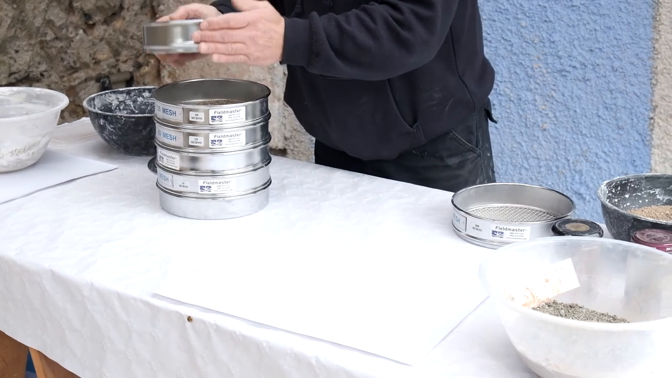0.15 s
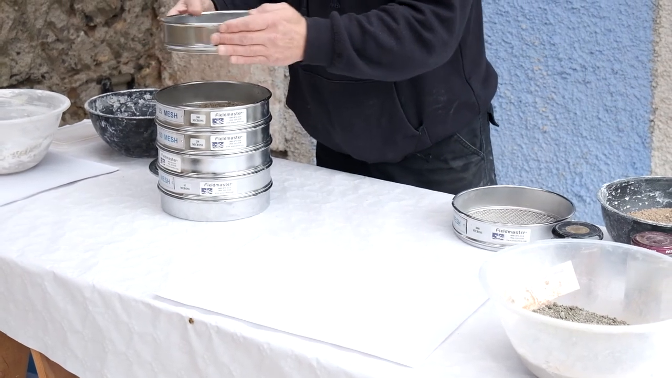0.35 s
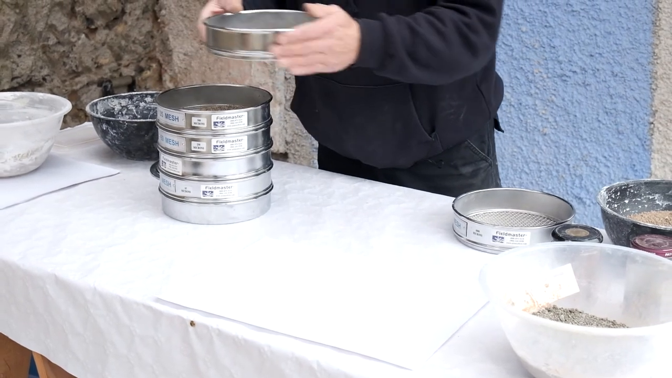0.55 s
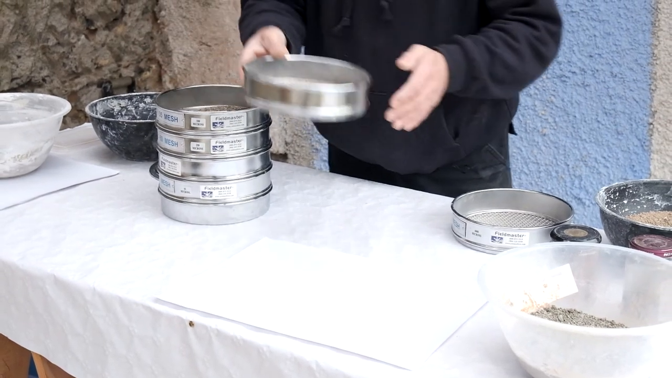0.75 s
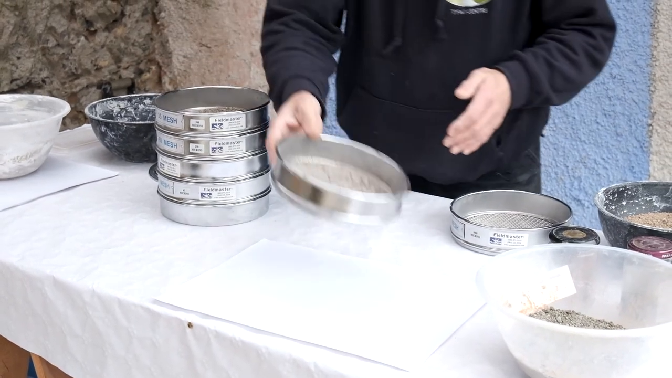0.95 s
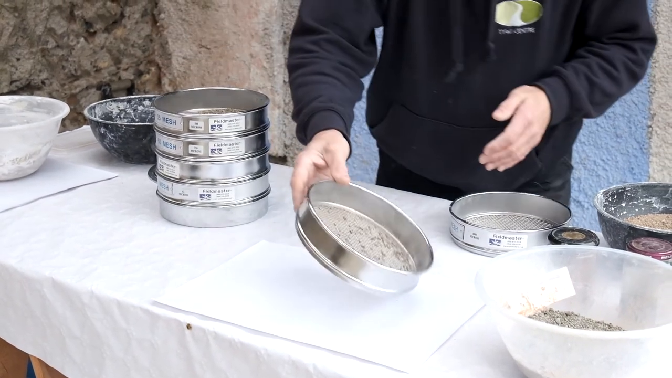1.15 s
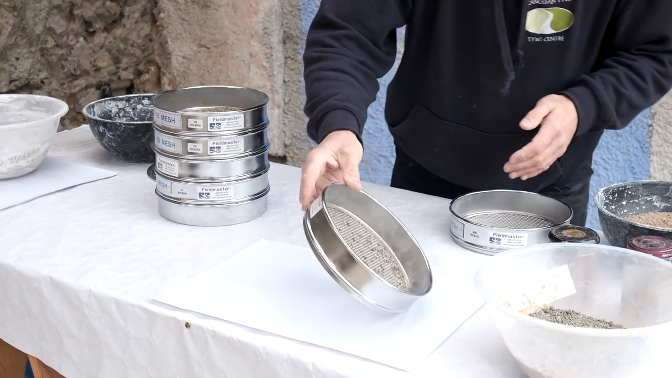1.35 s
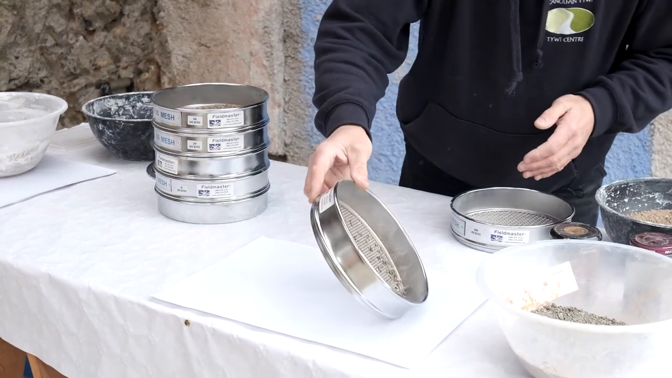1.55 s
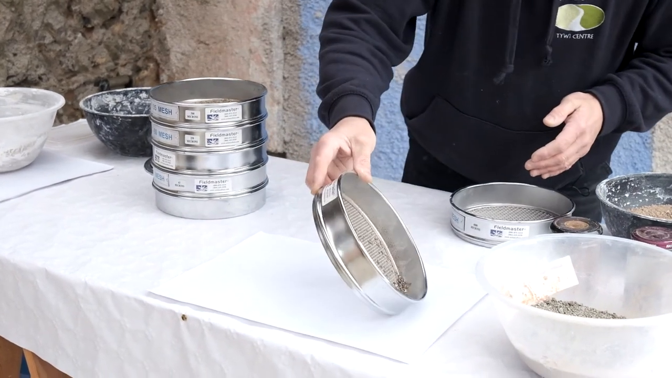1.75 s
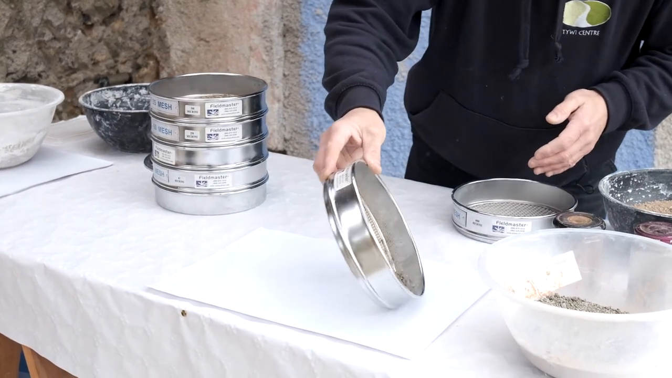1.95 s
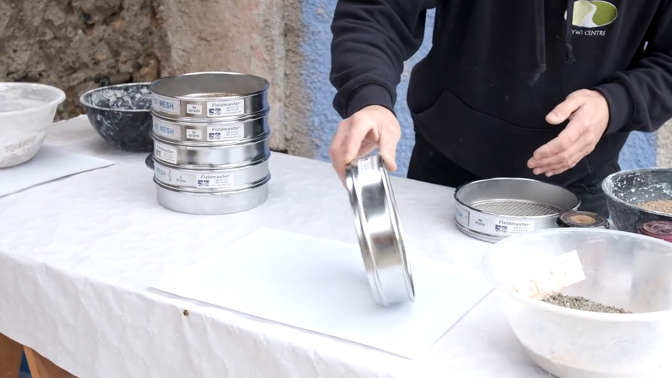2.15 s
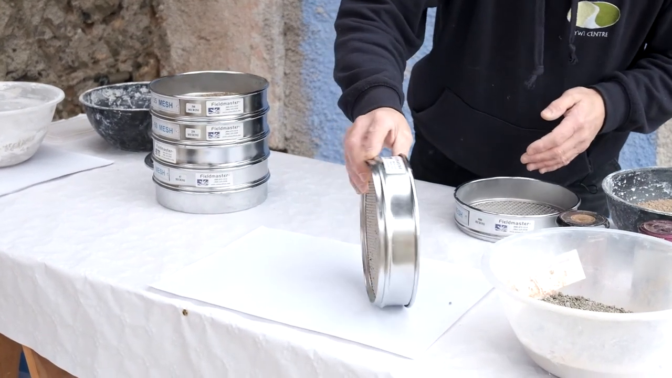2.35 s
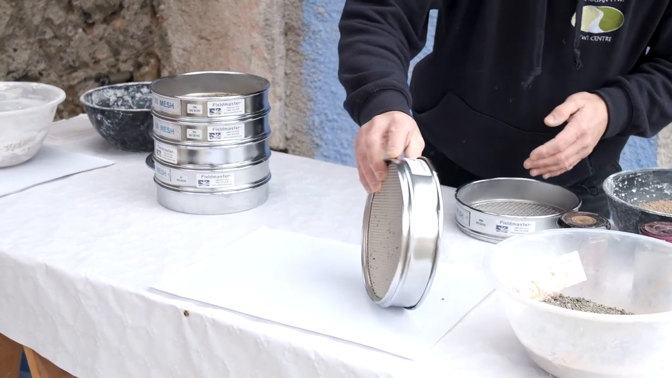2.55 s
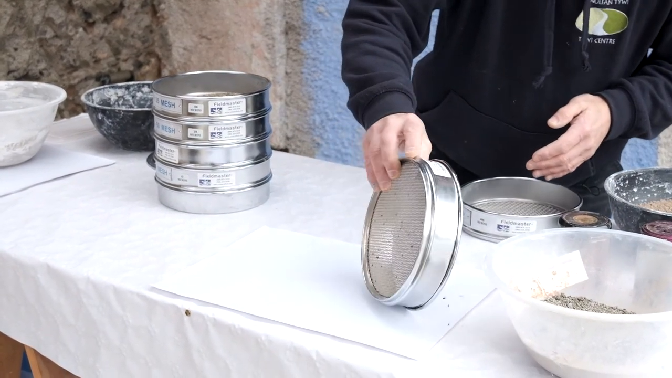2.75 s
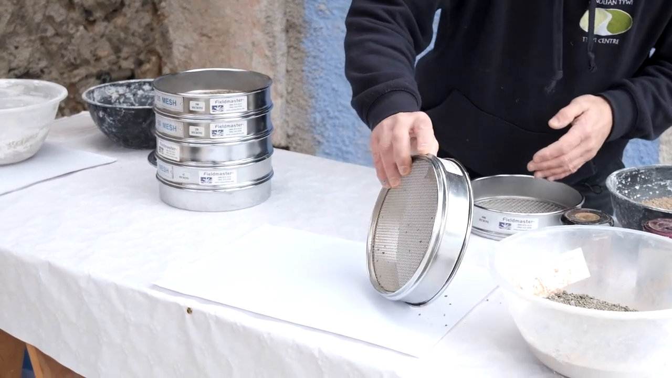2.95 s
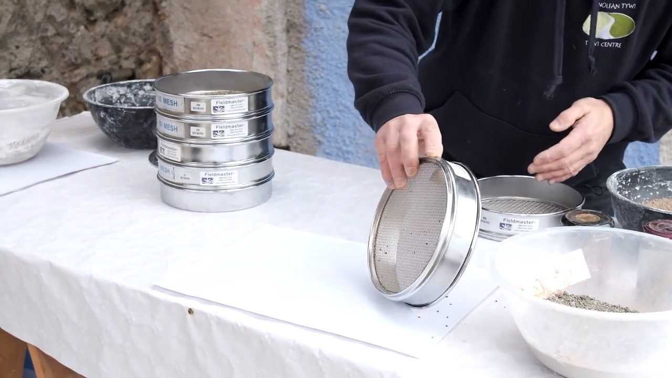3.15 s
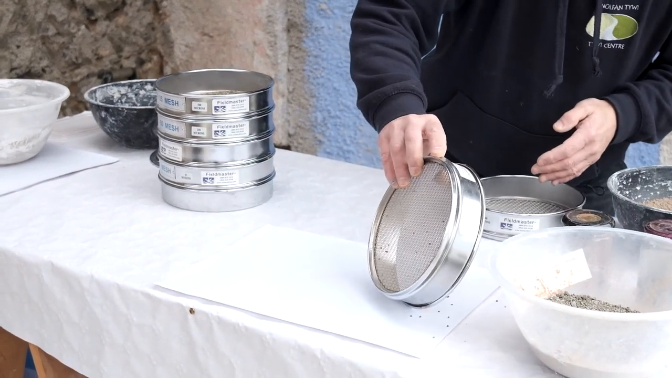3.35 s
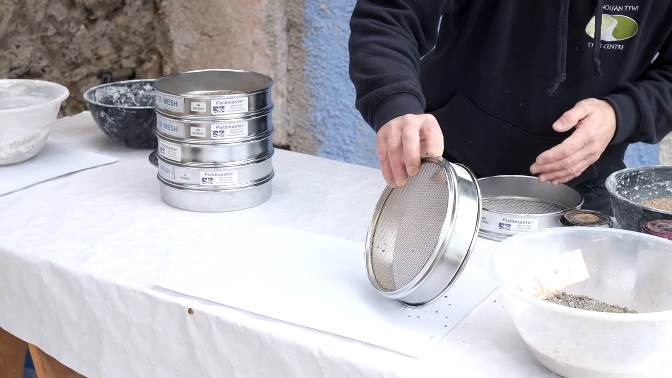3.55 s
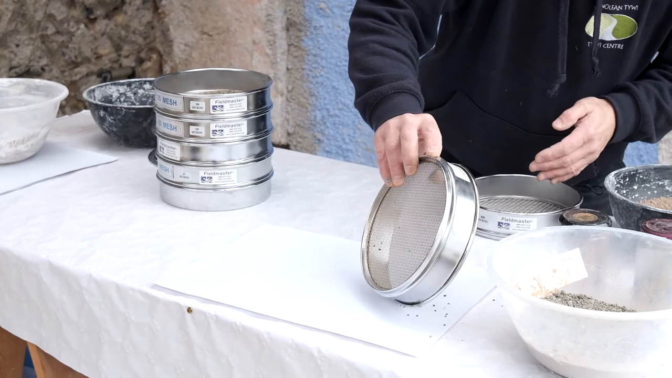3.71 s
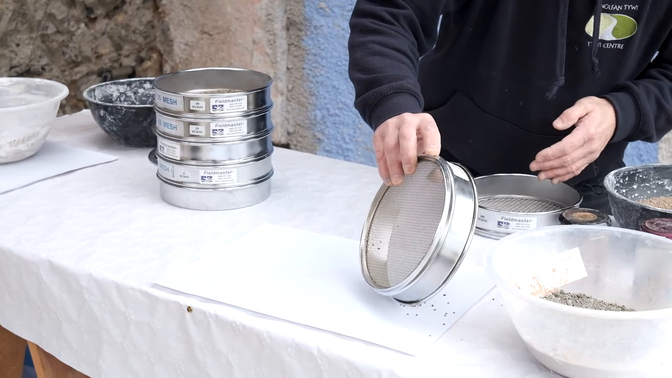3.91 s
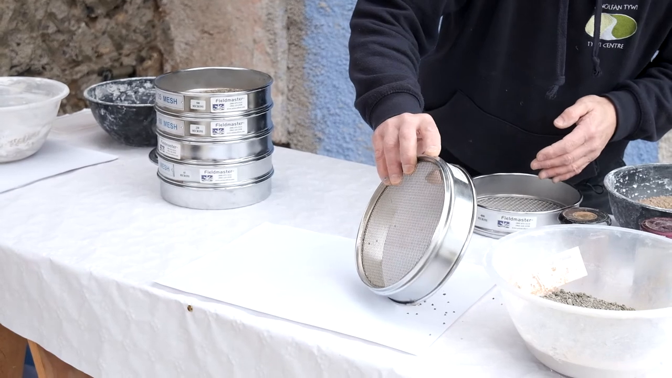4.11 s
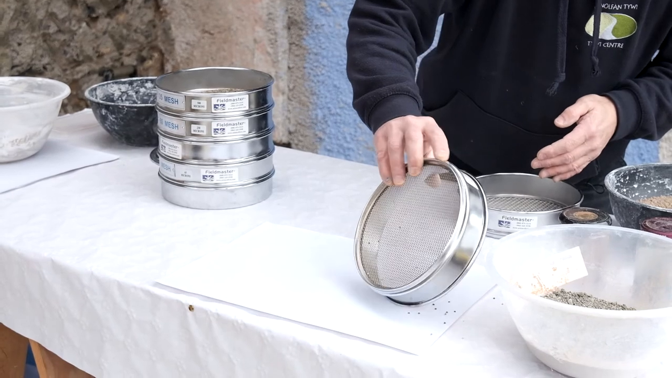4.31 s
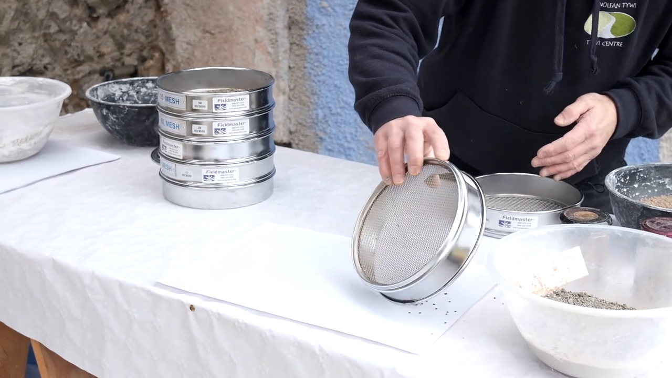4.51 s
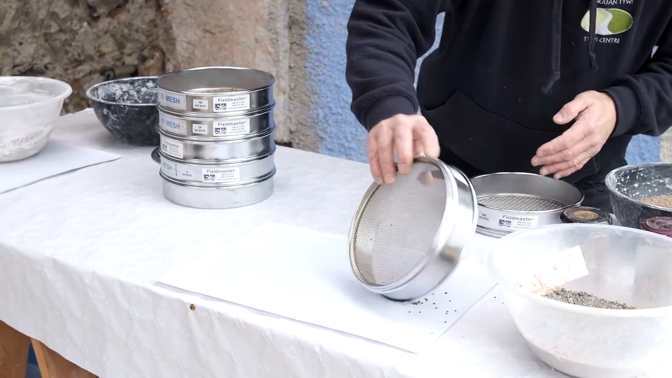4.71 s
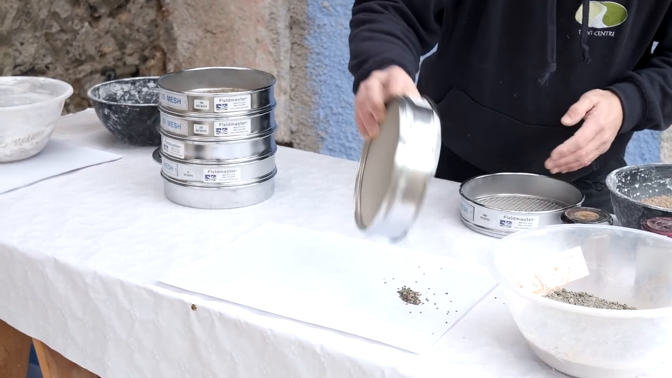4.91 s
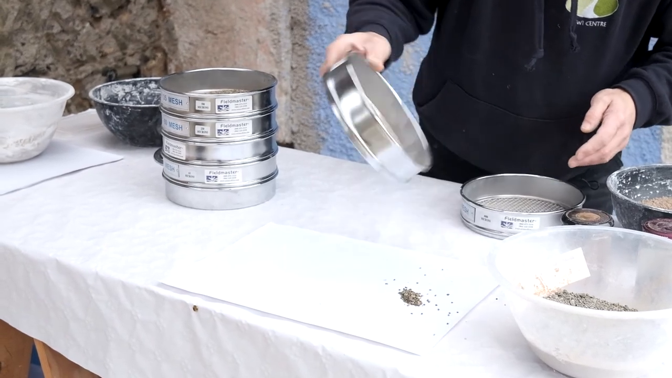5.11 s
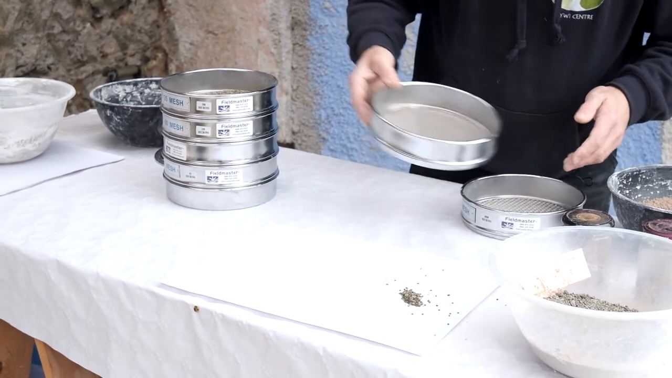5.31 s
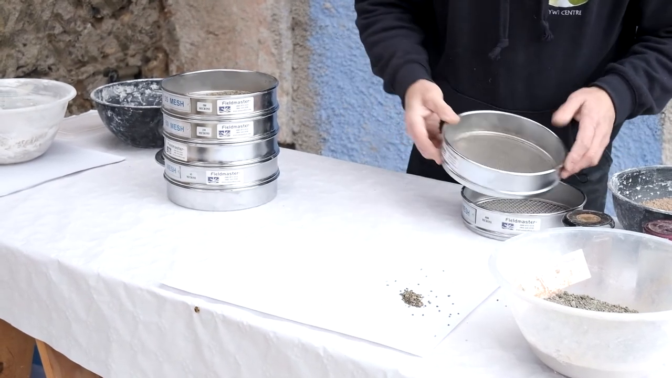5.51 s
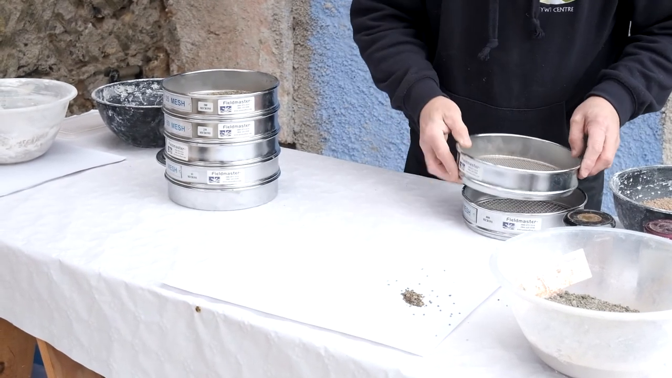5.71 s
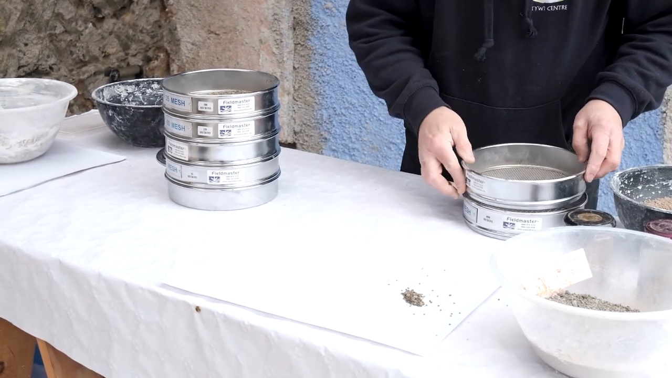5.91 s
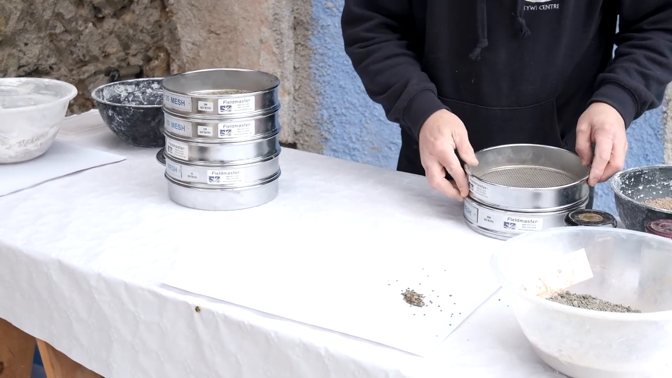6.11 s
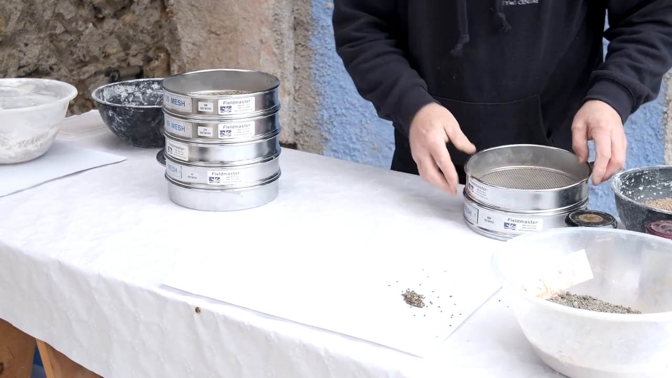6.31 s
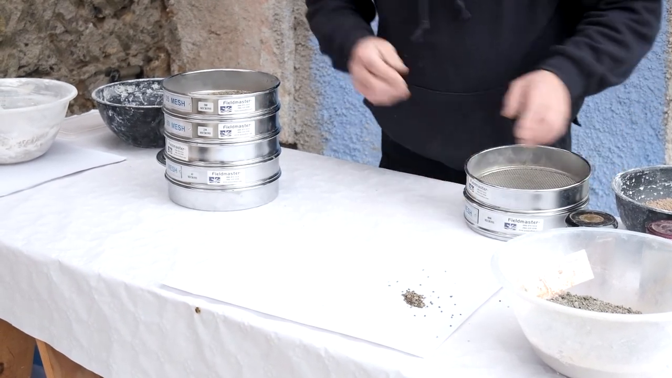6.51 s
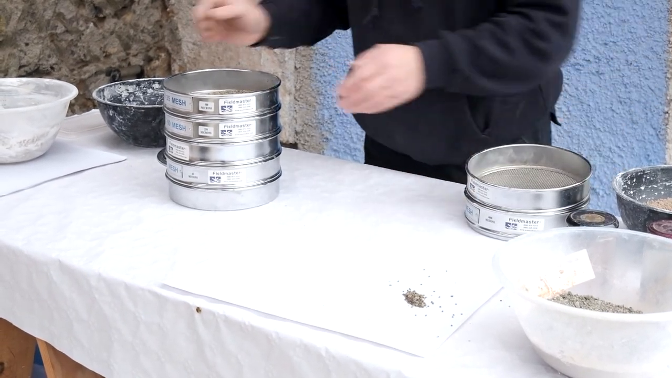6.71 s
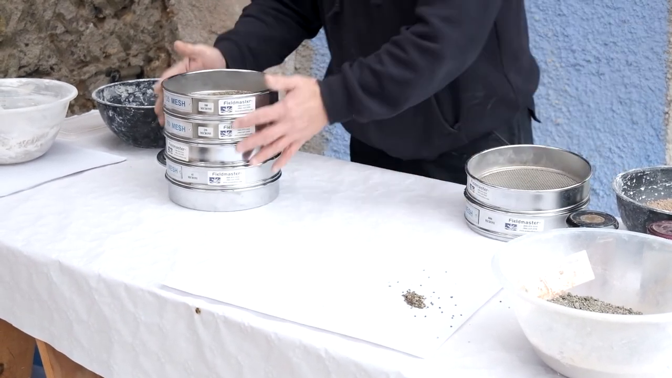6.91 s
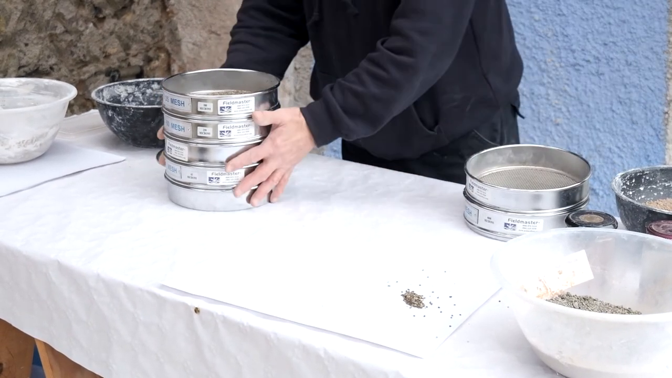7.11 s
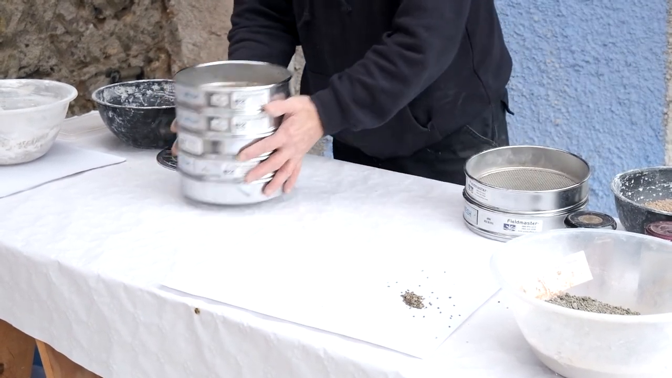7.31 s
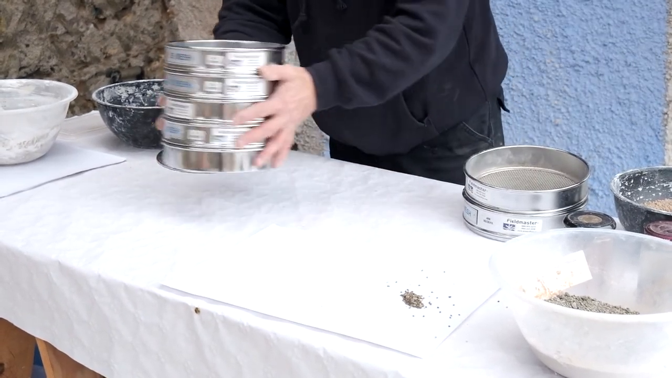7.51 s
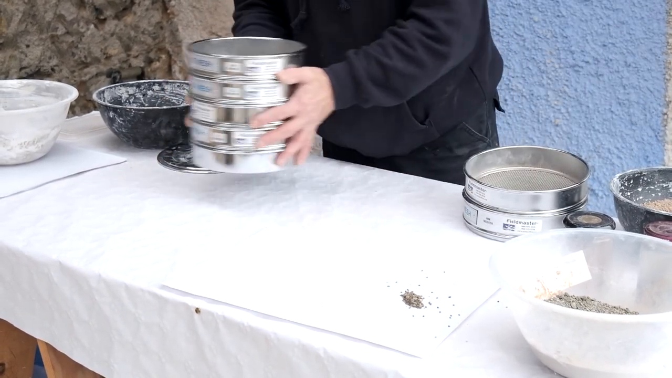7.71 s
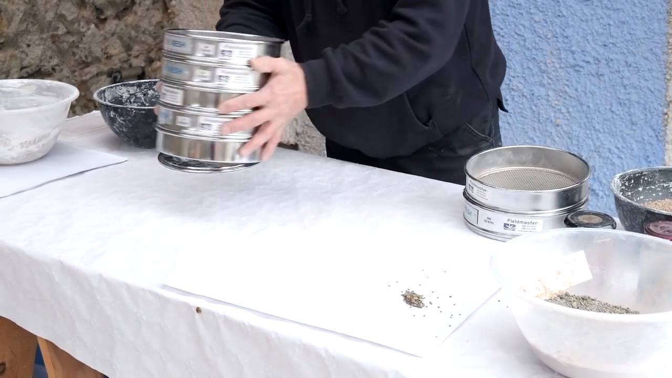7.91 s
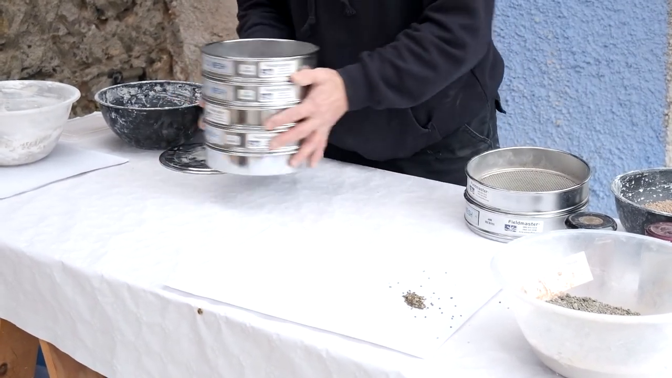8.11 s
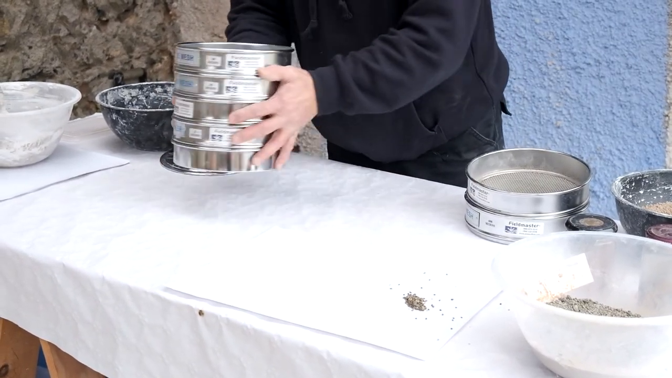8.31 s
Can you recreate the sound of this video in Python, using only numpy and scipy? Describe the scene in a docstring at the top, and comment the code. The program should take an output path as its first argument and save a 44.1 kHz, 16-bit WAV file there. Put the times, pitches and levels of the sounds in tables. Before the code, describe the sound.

Outdoors, gritty sand swishes off steel mesh, a run of loud table knocks empties the sieve, it nests with a hollow clunk, then fine sand hisses.

```python
"""Outdoors, coarse sand is swirled against the rim of a metal sieve, slides down its mesh and spills onto paper,
as filtered grain showers and ticks. Then the rim is knocked on the table to empty it: decaying modes of board and steel,
with leftover sand jumping. The hardest knocks overload the microphone and turn its gain down. The sieve drops into another
with a hollow clunk; steel is rubbed, the stack is grabbed, nudges the table, and is shaken so that fine sand hisses through.
Behind it all lie open air and a far road in filtered noise; midway a small bird whistles in gliding sines."""
import sys
import numpy as np
from scipy import signal
from scipy.io import wavfile
from scipy.ndimage import uniform_filter1d

SR = 44100
rng = np.random.default_rng(int(sys.argv[2]) if len(sys.argv) > 2 else 0)


def waveform_to_disk(signal):
    """Save audio, clipped to [-1, 1], as 16-bit WAV at the path in sys.argv[1]."""
    frames = np.transpose(np.atleast_2d(signal))
    scaled = np.clip(frames, -1, 1) * 32767
    samples = np.round(scaled).astype(np.int16)
    wavfile.write(sys.argv[1], SR, samples)


N = 373073
TIME = np.arange(N) / SR  # seconds

# sieve knocked on the table, later the stack nudging it: t/s, relative strength/dB, hardness as a low-pass corner f/Hz
KNOCKS = [(2.478, -23.5, 450), (2.7232, -24, 383), (2.9413, -18, 337), (3.08, -15, 360), (3.217, -31, 400),
          (3.441, -14.5, 246), (3.56, -17, 556), (3.7537, -7, 320), (3.932, -4.5, 430), (4.0672, -3.5, 310),
          (4.2066, -3, 393), (4.3463, 5, 910), (4.5149, 8, 645), (4.632, -1, 393), (4.7271, 4, 690),
          (7.129, -23, 80), (7.244, -30, 111), (7.303, -29, 80)]
# spectrum of a grain landing on paper: f/Hz, level/dB
PAPER_COLOUR = [(500, -23), (2500, -24), (4000, -9), (6300, 3.5), (8000, -8.5), (11000, -7), (13000, -17),
                (16000, -28)]
# spectrum of sand sliding on the mesh: f/Hz, level/dB
SLIDING_COLOUR = [(1060, -44), (1800, -26.5), (2100, -28.5), (2320, -15.5), (2500, -31.5), (3110, -22),
                  (3400, -17), (4980, -6.5), (5610, -2), (7430, -5), (9410, 1), (13300, -3.5), (15800, -19)]
# spectrum of sand running against the rim and over it: f/Hz, level/dB
RIM_COLOUR = [(1060, -51), (1800, -14), (2660, -13.5), (2990, -13), (3460, -13.5), (4720, -3), (6080, -4.5),
              (6720, 0), (8140, -3), (9580, -2.5), (10800, -2), (13500, -11), (15800, -18)]


def pour(sand_db=3.5, mesh_db=-12, patter_db=-10):
    """Coarse sand slides on the mesh, which drums under it, runs against the rim, later over it, and patters."""
    # drumming of the taut mesh: f/Hz, level/dB
    mesh_colour = [(100, -30), (400, -23.5), (650, -9.5), (850, -5.5), (1000, 11), (1250, -8),
                   (1600, -11.5), (3000, -22)]
    on_mesh, at_rim = streams()
    sliding = unit(colour(grains(2000, 3.2, -10, 0.05), SLIDING_COLOUR))
    running = unit(colour(grains(3000, 2.9, -12.5, 0.085), RIM_COLOUR))
    patter = unit(colour(grains(130, 2.4, -30, 0.02), PAPER_COLOUR))
    drum = unit(colour(rng.standard_normal(N), mesh_colour))

    # the square root turns stream power into a gain
    sand = np.sqrt(on_mesh) * sliding
    sand += np.sqrt(at_rim) * (running + amp(patter_db) * patter)
    return amp(sand_db) * sand + amp(mesh_db) * np.sqrt(on_mesh + at_rim) * drum


def streams(flank=1.93):
    """Power of the sand on the mesh and of the sand at the rim: each slide swells and dies away."""
    # sand sliding as the sieve is swirled, tilted and tipped over: peak t/s, rise/s, fall/s,
    # flow level/dB, share running against the rim while swirled, later over it/0-1
    slides = [(0.06, 0.069, 0.046, -35, 0.43), (.21, 0.065, 0.15, -54, 0.7), (.56, .04, .06, -64, 0.6),
              (.73, .06, 0.055, -62.5, 0.5), (1.93, .46, 0.26, -39, 0.07), (2.651, 0.3, 0.11, -50.5, 0),
              (3.1, 0.47, 0.19, -49.5, 0.88), (3.45, 0.14, 0.017, -53.5, 0.8), (3.62, 0.15, 0.18, -55, 1)]
    on_mesh, at_rim = np.zeros((2, N))
    for s, rise_s, fall_s, db, share in slides:
        away = np.maximum((s - TIME) / rise_s, (TIME - s) / fall_s)
        gain = amp(db) * np.exp(-abs(away) ** flank)  # flank 1 is pointed, 2 a round bell
        power = gain ** 2
        on_mesh += (1 - share) * power
        at_rim += share * power
    return on_mesh, at_rim


def ticks(rim_db=11.5, paper_db=6.5, ring_db=-23, wet_db=-13, size=8192):
    """Coarse grains and at last a finger ring briefly on the steel rim; grains land dead on paper."""
    # ticks on the steel rim, coarse grains and at the last two times a finger: t/s, relative level/dB
    rim_hits = [(.4805, -33), (1.080, -34), (1.393, -25), (1.4366, -18.5), (1.8248, -17), (1.9909, -16),
                (2.005, -18), (2.2358, -17), (2.288, -25), (2.388, -23), (2.4137, -23), (2.477, -25),
                (2.6484, -21), (2.6715, -22), (3.5205, -28), (3.916, -27), (4.1085, -25), (5.073, -35),
                (5.408, -37)]
    # the largest grains landing on the paper: t/s, relative level/dB
    paper_hits = [(2.7265, -20), (2.8924, -14), (2.941, -12.5), (3.1245, -19.5), (3.14, -16.5),
                  (3.607, -14.5), (3.63, -19), (3.763, -16), (4.25, -20), (4.318, -33), (4.497, -24.5),
                  (4.564, -13), (4.6337, -21), (4.7725, -18), (4.817, -26.5), (4.842, -31)]
    # smaller loose grains on the rim: from t/s, to t/s, rate/(grains per s), level above the flow/dB
    rim_strays = [(1.15, 1.45, 24, 22.5), (1.448, 2.2, 19.5, 15), (2.2, 3.25, 16, 23)]
    # smaller loose grains on the paper: from t/s, to t/s, rate/(grains per s), level above the flow/dB
    paper_strays = [(2.702, 3.5, 18, 22.3), (3.6, 3.94, 45, 28)]
    out = np.zeros(N)
    on_mesh, at_rim = streams()

    for s, db in rim_hits + strays(on_mesh + at_rim, rim_strays):
        tick = colour(burst(0.011, -9, 0.06, size=size), SLIDING_COLOUR)
        tick += amp(ring_db) * frame(size=size)
        add(out, s, amp(db + rim_db) * tick / np.linalg.norm(tick))

    for s, db in paper_hits + strays(at_rim, paper_strays):
        tick = colour(burst(0.006, -25, 0.03), PAPER_COLOUR)
        add(out, s, amp(db + paper_db) * tick / np.linalg.norm(tick))
    return out + amp(wet_db) * yard(out)


def strays(power, table, spread_db=4, count=48):
    """Grains (t/s, level/dB) that come loose at uneven intervals, stronger in a fuller stream."""
    rows = []
    for start, end, per_s, db in table:
        when, size = rng.random((count, 2)).T
        times = start + (np.arange(count) + 2 * when) / per_s
        flow_db = 10 * np.log10(np.interp(times, TIME, power) + 1e-12)
        level_db = flow_db + db + spread_db * (2 * size - 1)
        rows += [(s, level) for s, level in zip(times, level_db) if s < end]
    return rows


def knocks(table_db=-1, wet_db=-10, cut_hz=185, sway_db=-39, sway_growth=0.677):
    """The rim thumps the table; harder blows reach higher modes and make the steel clash."""
    # modes of the table with the sieve on it: f/Hz, level/dB, t60/s
    table_modes = [(157.1, -22, 0.42), (240, -22.5, 0.078), (260.3, -23.5, .21), (296.7, 9, 0.024),
                   (314, -31, .2), (347.5, -24.5, .22), (400, -14.5, 0.12), (456, -19, .14),
                   (544.5, 5.5, 0.025), (540, -27.5, 0.15), (616.6, -25.5, .18), (708, -22, 0.131),
                   (793.4, -22, .12), (904, -3.5, 0.027), (888, -27, 0.2), (1073.5, -25.5, 0.1187),
                   (1296, -27.5, 0.09), (1575, -23, .08), (1804, -17, 0.046)]
    # the whole table rocking on its legs: f/Hz, level/dB, t60/s
    sway_modes = [(96.4, 8, 0.33), (154, 11.5, .2)]
    board_rise_s, clash_rise_s = 0.0025, 0.0015  # board and steel take a moment to swing fully
    clash_db, clash_growth = -37.5, 0.75  # growth: clash dB per dB of strength
    clash_db_per_octave, usual_hardness_hz = 5.5, 400

    out = np.zeros(N)
    board = build_up(-modes(table_modes), board_rise_s)
    # a board radiates little bass
    ring = signal.sosfilt(signal.butter(3, cut_hz, "high", fs=SR, output="sos"), board)
    for s, db, corner_hz in KNOCKS:
        softness = signal.butter(2, corner_hz, fs=SR, output="sos")
        thump = amp(db + table_db) * signal.sosfilt(softness, ring)
        sway = amp(sway_db + sway_growth * db) * modes(sway_modes)  # grows more slowly than the thump
        add(out, s, thump + amp(wet_db) * yard(thump, delay=0.009) + sway)

        hardness_octaves = np.log2(corner_hz / usual_hardness_hz)
        metal_db = clash_db + clash_growth * db + clash_db_per_octave * hardness_octaves
        add(out, s, amp(metal_db) * build_up(clash(), clash_rise_s))
    return out


def jolts(t60=0.26, rise_s=0.0045, patter_db=-6, size=20000):
    """Each knock makes the sand left on the mesh jump and settle, and shakes a few grains onto the paper."""
    jolt_base_db, jolt_growth = -36, 0.56  # growth: jolt dB per dB of strength
    emptying_db_per_s = 6  # less and less sand is left
    flow, t = np.zeros(N), TIME[:size]
    first_s = KNOCKS[0][0]
    for s, db, _ in KNOCKS:
        jolt_db = jolt_base_db + jolt_growth * db - emptying_db_per_s * (s - first_s)
        add(flow, s, build_up(amp(jolt_db - 60 * t / t60), rise_s))
    jumping = unit(colour(grains(2900, 2.3, -21.5, 0.064), RIM_COLOUR))
    patter = unit(colour(grains(130, 1.9, -28, 0.02), PAPER_COLOUR))
    return flow * (jumping + amp(patter_db) * patter)


def sift(sand_db=7.5, mesh_db=-17):
    """Countless fine grains hiss through the closed stack, surging with the shakes."""
    # spectrum of fine sand in the stack: f/Hz, level/dB
    sift_colour = [(760, -51), (1300, -26), (2020, -19), (2760, -22.5), (4150, -12.5), (5850, -5.5),
                   (7520, 2), (8710, -1), (11400, 0), (14100, -8.5), (15800, -16)]
    # drumming of the meshes: f/Hz, level/dB
    drum_colour = [(100, -31), (350, 5.5), (500, -5), (900, -6), (2000, -8), (4000, -19)]
    start_s, rise_s, flow_db = 7.47, 0.22, -39.5  # sand starts to run as the stack is lifted
    drain_from_s, drain_db_per_s = 7.9, 8.5  # the flow thins as the meshes clear
    shake_hz, shake_db, shake_dip_s = 5.55, 0.9, 8.71  # the surge is weakest at the dip

    running = 1 - np.exp(-np.maximum(TIME - start_s, 0) / rise_s)
    surge_db = -shake_db * np.cos(2 * np.pi * shake_hz * (TIME - shake_dip_s))
    drained_db = drain_db_per_s * np.maximum(TIME - drain_from_s, 0)
    flow = running * amp(flow_db + surge_db - drained_db)
    hiss = unit(colour(grains(16000, 2.16, -15, 0.088, count=10), sift_colour))
    drum = unit(colour(rng.standard_normal(N), drum_colour))
    return flow * (amp(sand_db) * hiss + amp(mesh_db) * drum)


def clunks(body_db=14, clash_db=-10, ring_db=-2, wet_db=-8, size=16000):
    """One sieve drops into the next and settles, then the stack is grabbed: a hollow clunk under the clash."""
    # sieve meeting sieve, then the stack being grabbed (last two rows):
    # t/s, relative levels of clunk/dB, metal clash/dB, ring of the pair/dB
    contacts = [(5.9556, -28.5, -20, -22.5), (6.0982, -36.5, -31.5, -26), (6.2365, -54, -40, -33),
                (7.074, -53, -46, -56), (7.2142, -51.5, -39.5, -52)]
    # spectrum of two nested sieves: f/Hz, level/dB
    nest_colour = [(40, -24), (100, -5), (170, 9), (230, 5), (310, 8), (400, 7.5), (560, 4), (720, 0.5),
                   (950, -0.5), (1400, -21), (2000, -15), (4000, -39)]
    # two nested sieves ringing: f/Hz, level/dB, t60/s
    pair_modes = [(556, 8.5, 0.037), (644, -12, 0.07), (1953, -13.5, 0.075)]
    out = np.zeros(N)
    for s, db, metal_db, pair_db in contacts:
        body = amp(db + body_db) * colour(burst(0.084, -6.0, 0.26, size=size), nest_colour)
        body += amp(pair_db + ring_db) * modes(pair_modes, size=size)
        metal = amp(metal_db + clash_db) * clash(size=size)
        add(out, s, body + amp(wet_db) * yard(body) + metal)
    return out


def ping(s=3.5605, ring_db=-33.5, clash_db=-40.5):
    """The rim catches a glancing touch and rings free, with only a light crash."""
    out = np.zeros(N)
    add(out, s, amp(ring_db) * frame() + amp(clash_db) * clash())
    return out


def clash(ring_db=-7, wet_db=-8, size=16000):
    """Steel struck: a dense crash and the frame's ring."""
    # steel frame struck as a whole: f/Hz, level/dB
    crash_colour = [(200, -25), (700, 10), (1900, 3), (2800, -4), (3700, -2), (4700, -0.5), (6500, -4),
                    (9000, -2), (12000, -6), (16000, -24.5)]
    steel = colour(burst(0.085, -10.5, 0.42, size=size), crash_colour)
    steel += amp(ring_db) * frame(size=size)
    return steel + amp(wet_db) * yard(steel)


def frame(size=16000):
    """The steel frame's modes, in a different random mix at every touch."""
    # ringing of the steel frame: f/Hz, level/dB, t60/s
    frame_modes = [(1702, -22.5, 0.298), (1990, -22, 0.13), (2800, -20.5, 0.2012), (2990, -23.5, 0.17),
                   (4430, -4, 0.08), (4630, -1.5, 0.049), (4923, -3, 0.081), (5050, -5, 0.079),
                   (6092, -4.5, 0.053), (7044, -7.5, .08), (8200, -23, 0.049), (9350, -13.5, 0.1),
                   (10800, -15.5, 0.084)]
    shape = (len(frame_modes), 1)
    mix = rng.uniform(0.6, 1.4, shape) * rng.choice([-1, 1], shape)
    return modes(frame_modes, mix, size=size)


def scrapes():
    """Steel and fingers rub on steel: tiny slips ring the frame for as long as the pressure lasts."""
    # rubs: middle t/s, length between the 1/e points/s, level/dB
    rubs = [(5.089, 0.18, -63.5), (5.431, 0.059, -61), (5.545, 0.083, -58), (5.678, .12, -65.5),
            (5.797, 0.087, -55), (6.085, 0.021, -50), (6.103, 0.037, -51), (6.204, 0.084, -67),
            (7.133, 0.15, -57), (7.319, 0.06, -57)]
    # spectrum of rubbed steel: f/Hz, level/dB
    steel_colour = [(300, -15), (2300, -1), (3200, -3.0), (5000, -3.0), (8700, 0), (12000, -1.0), (16000, -26)]
    pressure = sum(amp(db) * np.exp(-(2 * (TIME - s) / length) ** 2) for s, length, db in rubs)
    slips = grains(2500, 4.5, -13, 0.13, count=2)
    return pressure * unit(colour(slips, steel_colour))


def bird(waver=0.016, wet_db=1, song_db=-5):
    """Thin wavering whistles: gliding sines blurred by distance."""
    # notes: t/s, length/s, start f/Hz, end f/Hz, relative level/dB
    notes = [(4.863, 0.062, 8370, 7930, -57), (4.94, 0.053, 8100, 7100, -55),
             (5.091, 0.088, 5970, 5500, -63.5), (5.2, .16, 8350, 8400, -68),
             (5.532, 0.084, 4070, 4130, -60.5), (5.655, 0.087, 4250, 4310, -55.5),
             (5.862, 0.073, 4010, 3890, -54), (6.633, 0.078, 7360, 6200, -64)]
    out = np.zeros(N)
    for s, length, start_hz, end_hz, db in notes:
        n = int(length * SR)
        wobble = unit(uniform_filter1d(rng.standard_normal(N // 16), size=120))[:n]
        hz = np.linspace(start_hz, end_hz, n) * (1 + waver * wobble)
        whistle = np.sin(2 * np.pi * np.cumsum(hz) / SR)
        add(out, s, amp(db + song_db) * np.hanning(n) * whistle)
    return out + amp(wet_db) * yard(out)


def outdoors(air_db=-54):
    """Steady open air and the roar of far cars, swelling and fading with their distance."""
    # open air: f/Hz, level/dB
    air_colour = [(12, -34), (20, -5.5), (53, 1.5), (104, 0.5), (153, 1), (326, -9.5), (510, -7), (942, -3),
                  (1560, -17), (2570, -26), (3700, -25.5), (4500, -24), (11600, -36.5), (13700, -56.5),
                  (15800, -58.5)]
    # tyre roar: f/Hz, level/dB
    road_colour = [(60, -4.5), (200, -18), (400, -6), (600, -17), (880, 0.5), (1050, -4.5), (1350, -8),
                   (1900, -22.5), (3000, -38.5)]
    # cars on the far road: nearest at t/s, half the passing time/s, level/dB
    cars = [(.38, 0.33, -48), (1.75, 0.59, -51), (3.3, 0.67, -56.5), (8.5, 0.27, -53.5)]
    swell_hz = np.geomspace(0.5, 8, num=12)
    swell = unit(sum(np.sin(2 * np.pi * (f * TIME + rng.random())) / np.sqrt(f) for f in swell_hz))
    air = amp(air_db) * unit(colour(rng.standard_normal(N), air_colour, size=16384))

    # each car's power falls with the square of its distance
    power = sum(amp(db) ** 2 / (1 + ((TIME - s) / passing_s) ** 2) for s, passing_s, db in cars)
    road = np.sqrt(power) * unit(colour(rng.standard_normal(N), road_colour))
    return air + road * amp(0.5 * swell)  # the swell is 0.5 dB rms


def yard(x, delay=0.0045, size=22050):
    """Scatter from the walls, bowls and table top, each band dying at its own speed."""
    # decay of the scatter: f/Hz, t60/s
    yard_decay = [(100, 0.5), (300, 0.19), (900, 0.35), (2500, 0.46), (6000, 0.22), (15000, 0.081)]
    hz, t, z = signal.stft(rng.standard_normal(size), SR, nperseg=256)
    decay = amp(-60 * t / read(yard_decay, hz)[:, None])
    tail = signal.istft(z * decay, SR, nperseg=256)[1][:size]
    tail *= np.clip(TIME[:size] / delay - 0.5, 0, 1)  # fades in around the delay
    return signal.fftconvolve(x, tail / np.linalg.norm(tail))[:len(x)]


def grains(per_s, spread_db, ring_db, ring_t60, count=5):
    """A shower of grains of uneven size; each rings one of a few spots on the struck body."""
    size = amp(spread_db * np.minimum(rng.exponential(1, N), 5))
    hits = size * (rng.random(N) < per_s / SR)
    spot = rng.integers(0, count, N)
    shower = sum(signal.oaconvolve(hits * (spot == k), burst(0.005, ring_db, ring_t60))[:N]
                 for k in range(count))
    return unit(shower)


def burst(t60, ring_db, ring_t60, size=8192):
    """Dense modes of thin material: a quick crack and a weaker, longer ring, both in noise."""
    t = TIME[:size]
    return rng.standard_normal(size) * (amp(-60 * t / t60) + amp(ring_db - 60 * t / ring_t60))


def modes(table, mix=1, size=26000):
    """A struck body: a sum of dying sines."""
    hz, db, t60 = np.transpose(table)[:, :, None]
    t = TIME[:size]
    return (mix * amp(db - 60 * t / t60) * np.sin(2 * np.pi * hz * t)).sum(0)


def build_up(x, rise_s):
    """Softens the start of a sound with an exponential rise."""
    return x * (1 - np.exp(-TIME[:len(x)] / rise_s))


def colour(x, points, size=4096):
    """Causal minimum-phase filter with the given spectrum."""
    log_gain = np.log(amp(read(points, abs(np.fft.fftfreq(size, 1 / SR)))))
    taps = np.fft.ifft(np.exp(np.conj(signal.hilbert(log_gain)))).real
    return signal.oaconvolve(x, taps[:size // 2])[:len(x)]


def read(points, hz):
    """Reads a table over log frequency."""
    f, value = np.transpose(points)
    return np.interp(np.log(hz + 1), np.log(f + 1), value)


def add(mix, s, sound):
    """Mixes a sound in at a time in seconds."""
    part = mix[max(round(s * SR), 0):][:len(sound)]
    part += sound[:len(part)]


def amp(db):
    """Decibels to gain."""
    return 10 ** (np.asarray(db) / 20)


def unit(x):
    """Scales to rms 1."""
    return x / np.sqrt(np.mean(x ** 2) + 1e-20)


def scene():
    """All sources at the microphone, as one channel."""
    sand = pour() + ticks() + jolts() + sift()
    metal = knocks() + clunks() + ping() + scrapes()
    return (sand + metal + bird() + outdoors())[None]


def record(dry, depth_db=5.5, attack_s=0.05, edge_hz=15900):
    """Gain control turns down once a peak nears full scale and stays down; peaks clip; then the band limit."""
    loudest = np.maximum.accumulate(abs(dry).max(0))
    overload = np.clip((loudest - 0.8) / 0.2, 0, 1)
    r = np.exp(-1 / (attack_s * SR))
    reduction_db = depth_db * signal.lfilter([1 - r], [1, -r], overload)
    clipped = np.clip(dry * amp(-reduction_db), -1, 1)
    band_limit = signal.firwin(401, edge_hz, window=("kaiser", 8), fs=SR)
    return signal.oaconvolve(clipped, band_limit[None], "same")


dry = scene()
out = record(dry)
waveform_to_disk(out)
```